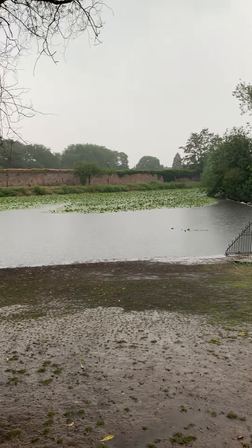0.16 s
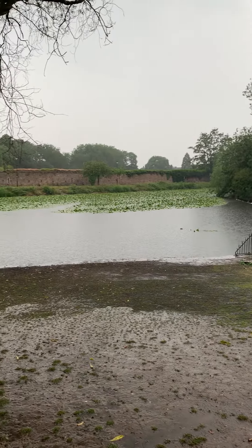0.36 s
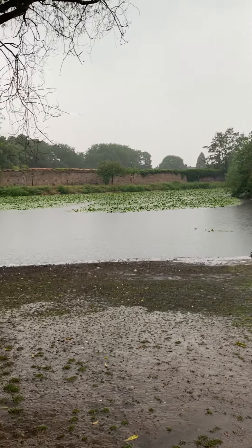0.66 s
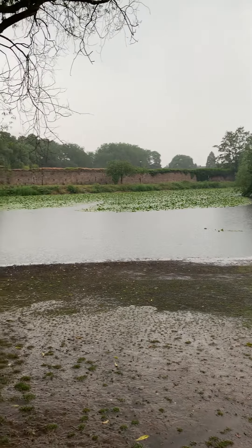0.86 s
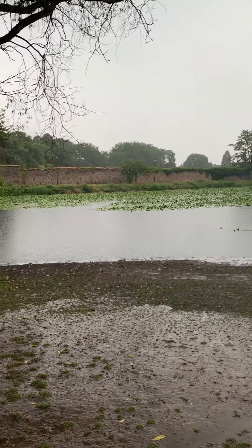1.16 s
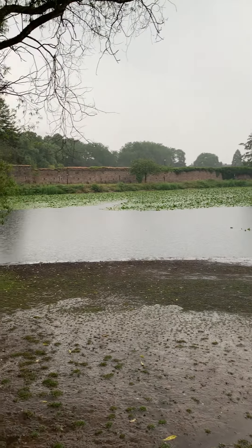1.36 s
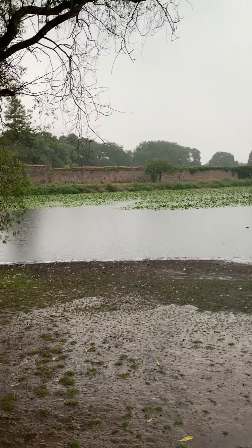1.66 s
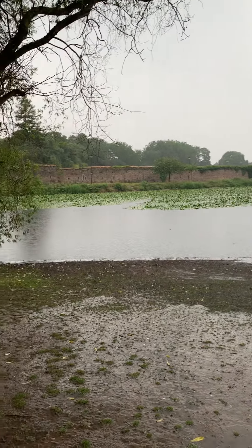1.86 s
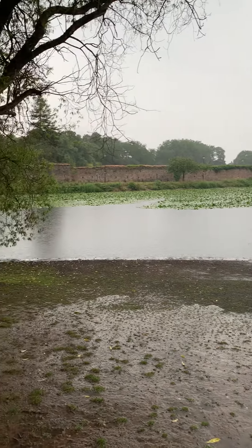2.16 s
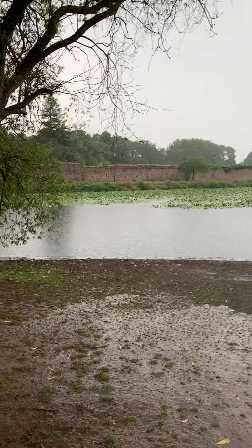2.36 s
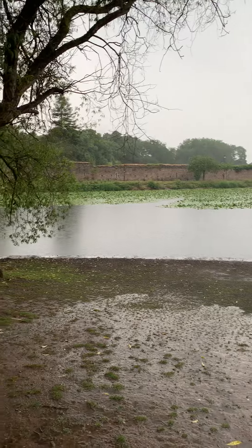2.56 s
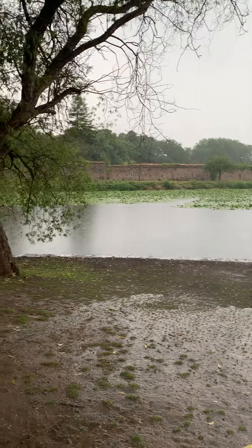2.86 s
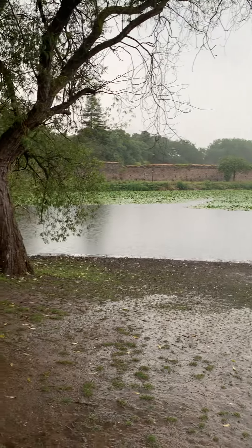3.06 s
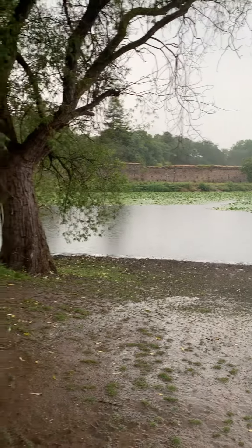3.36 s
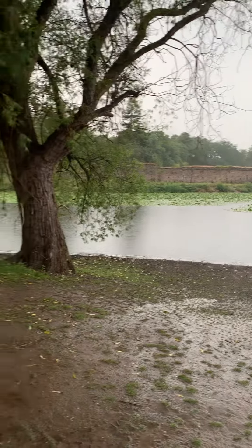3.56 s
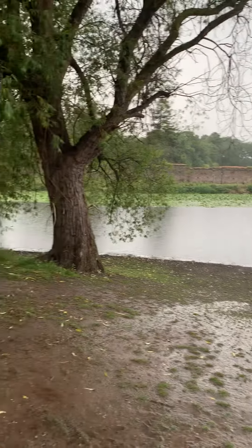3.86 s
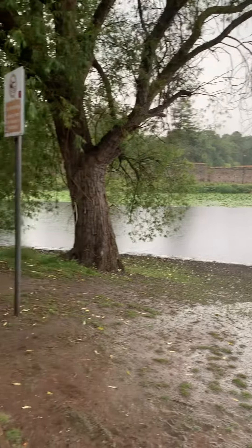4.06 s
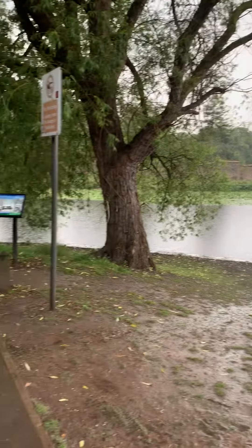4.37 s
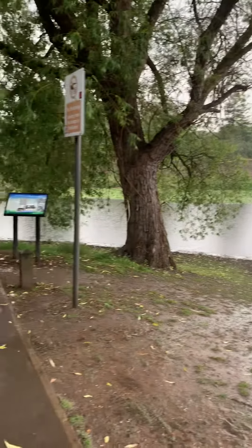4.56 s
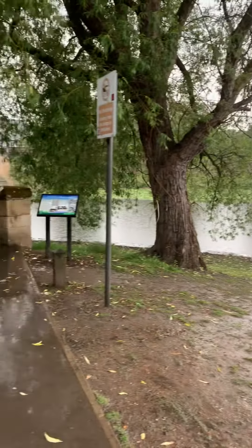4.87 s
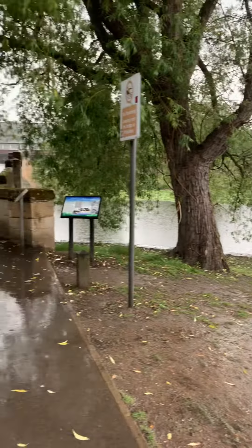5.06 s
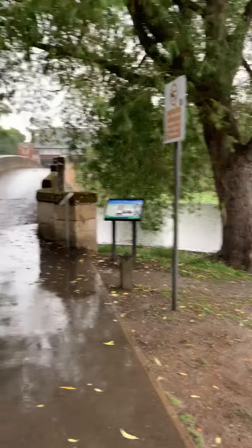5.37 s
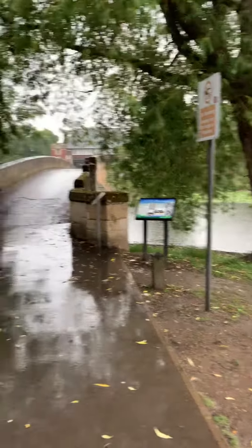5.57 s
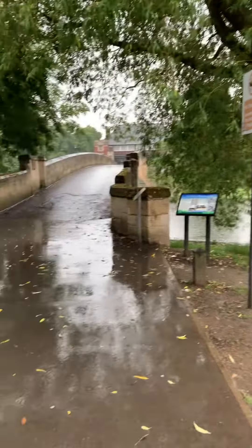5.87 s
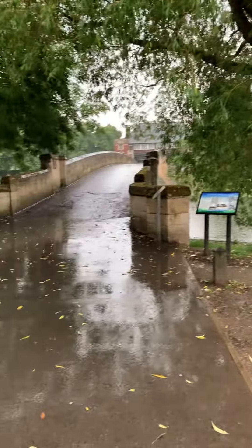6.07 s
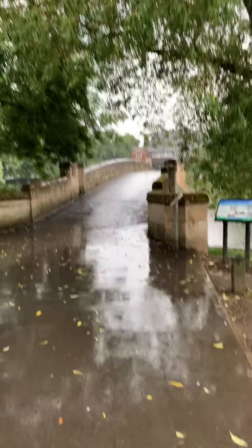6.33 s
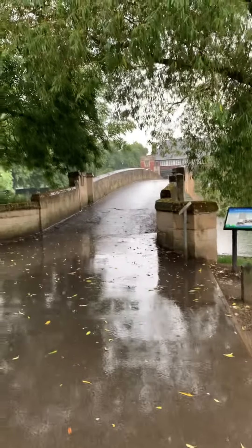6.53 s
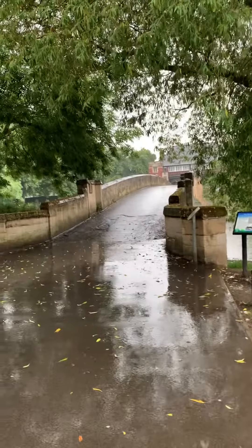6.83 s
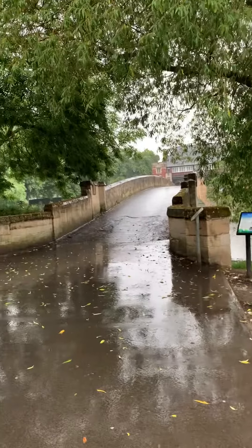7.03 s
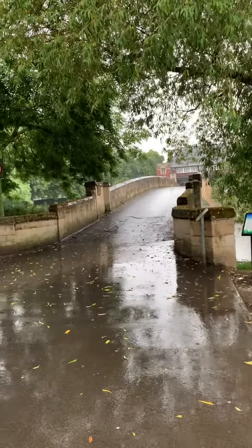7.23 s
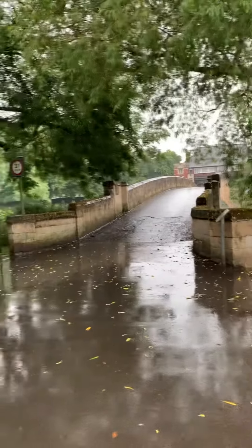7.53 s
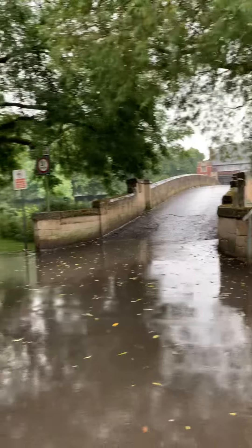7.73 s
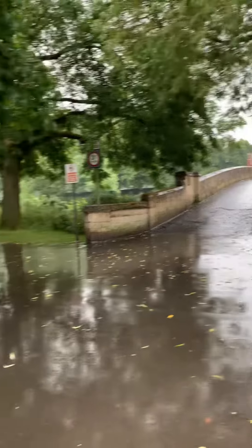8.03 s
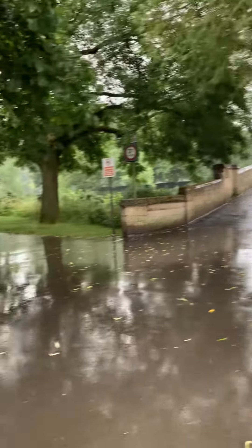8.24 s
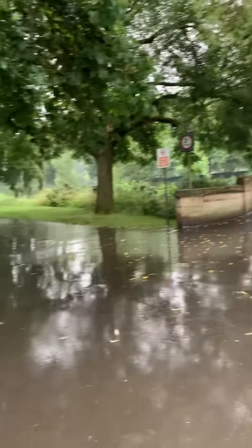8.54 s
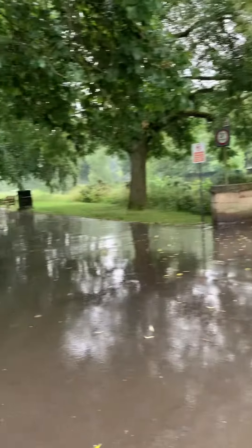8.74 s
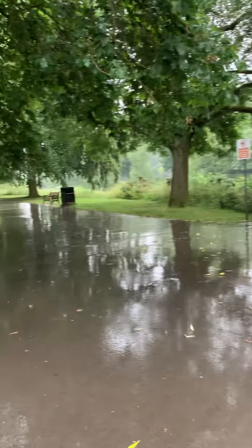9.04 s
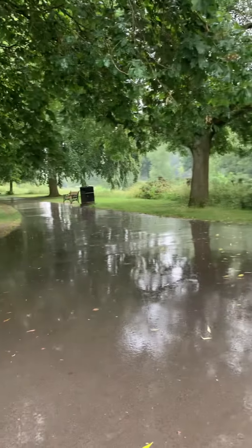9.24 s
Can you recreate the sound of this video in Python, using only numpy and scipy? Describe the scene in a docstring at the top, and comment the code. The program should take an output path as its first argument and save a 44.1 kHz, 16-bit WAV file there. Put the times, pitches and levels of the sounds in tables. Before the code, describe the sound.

Steady rain roars softly over a lake and trees, hissing on wet ground while close drops tick, plop and ring in puddles.

```python
"""Steady rain in a park

A phone under trees turns from a lake towards a puddled path. Far rain on water and foliage, shaped noise and impacts,
blends into a soft roar. Fine splashes hiss on the wet ground, single drops tick or plop close by and bubbles ring in
the puddles. Soft bumps and a rustle sound at the phone, and one short squeak is heard, over a low rumble of traffic.
Delay and phase between two close microphone ports give the rain a wide, phasey image."""
import sys
import numpy as np
from scipy import signal
from scipy.fft import rfft, irfft
from scipy.io import wavfile

SR = 44100
rng = np.random.default_rng(int(sys.argv[2]) if len(sys.argv) > 2 else 0)


def dump_mix(stems):
    """Bounce the given channels to the path in sys.argv[1] as a 16-bit WAV at rate SR."""
    frames = np.atleast_2d(stems).T  # one column per channel
    limited = np.clip(frames, -1, 1)  # hard clip at full scale
    pcm = np.round(limited * 32767).astype(np.int16)
    wavfile.write(sys.argv[1], SR, pcm)


N = 414540
TIME, FREQ = np.arange(N) / SR, np.arange(N // 2 + 1) * SR / N   # s, Hz


def from_db(db):
    """Decibels to gain."""
    return 10 ** (np.asarray(db) / 20)


def rms_one(x):
    """Scale to an rms of one."""
    return x / np.sqrt(np.mean(x ** 2) + 1e-20)


def in_time(rows):
    """Each column of a curve at every sample."""
    s, *columns = np.transpose(rows)
    return [np.interp(TIME, s, c) for c in columns]


def in_frequency(rows):
    """Each column of a spectrum at every frequency, joined on a log axis."""
    hz, *columns = np.transpose(rows)
    return [np.interp(np.log(FREQ + 1), np.log(hz), c) for c in columns]


def band(x, low_hz, high_hz, order=2):
    """Causal band-pass."""
    edges = np.clip([low_hz, high_hz], 10, .45 * SR)
    return signal.sosfilt(signal.butter(order, edges, "band", fs=SR, output="sos"), x)


def add(track, s, sound):
    """Mix a short sound into a track at time s."""
    i = int(s * SR)
    track[i:i + len(sound)] += sound[:N - i]


def drift(rate):
    """Slow chance that changes about rate times a second; spread 1."""
    slow = FREQ / (FREQ + 1) / (1 + (FREQ / rate) ** 2)
    return rms_one(irfft(rfft(rng.standard_normal(N)) * slow, N))


def shower(per_s, spread_db, largest_db):
    """Impacts at random moments, rms 1: mostly small with a few louder, or the reverse if the spread is negative."""
    size_db = np.minimum(spread_db * rng.exponential(1, N), largest_db)
    falls = rng.random(N) < per_s / SR
    return rms_one(falls * from_db(size_db) * rng.choice([-1, 1], N))


def scattered_drops(density, range_db, range_hz, count):
    """Rows (s, dB, Hz) of drops that fall by chance, more often where the density is high."""
    when, size, pitch = rng.random((count, 3)).T
    s = np.interp(when, np.cumsum(density) / np.sum(density), TIME)
    return list(zip(s, np.interp(size, [0, 1], range_db), np.interp(pitch, [0, 1], range_hz)))


def from_ground(x, turn_rad=2.25):
    """Sound from the ground reaches the right port 0.24 ms later and turned in phase."""
    spectrum = rfft(x)
    lead = 2 * np.pi * FREQ * 0.00024 + turn_rad
    return irfft(np.array([spectrum, spectrum * np.exp(-1j * lead)]), N)


# The way the phone points. Each row: time in seconds, turn in steps (0 lake, 1 tree on the bank, 2 path).
TURN = [(0, 0.02), (2.2, 0.092), (3.7, 0.78), (5.0, 1.28), (5.8, 1.7), (9.4, 2.3)]


def heading():
    """The turn of the phone at every sample, in steps from lake to path."""
    return np.clip(in_time(TURN)[0], 0, 2)


def far_patter(share, patchy_db, clump_rate):
    """Two spectra of far drops in a wash of countless smaller ones; each pitch range clumps and thins by itself."""
    washes = []
    for _ in range(2):
        drops = shower(per_s=900, spread_db=3.5, largest_db=14.5)
        washes.append(np.sqrt(share) * drops + np.sqrt(1 - share) * rng.standard_normal(N))
    spectra = rfft(washes)
    ranges = np.digitize(FREQ, np.geomspace(200, 3000, 19))
    patchy = np.zeros((2, N))
    for k in np.unique(ranges):
        patchy += irfft(spectra * (ranges == k), N) * from_db(patchy_db * drift(clump_rate))
    return rfft(rms_one(patchy))


def far_view(patter, field, low_hz, high_hz):
    """The patter as it arrives from one direction; air and leaves take the treble away."""
    level_db, likeness, lead, balance_db = in_frequency(field)
    edges = 1 / np.sqrt((1 + (low_hz / (FREQ + 1)) ** 8) * (1 + (FREQ / high_hz) ** 18))
    gain = from_db([level_db + balance_db / 2, level_db - balance_db / 2]) * edges * np.sqrt(SR / 2)
    shared, own = patter
    likeness = np.clip(likeness, 0, 1)
    right = likeness * shared * np.exp(-1j * lead) + np.sqrt(1 - likeness ** 2) * own
    return irfft(gain * np.array([shared, right]), N)


# Far rain on the lake, the bank and the trees along the path, as the two ports hear it before the edges roll off.
# Each row: frequency in Hz, level in dB per Hz, left-right likeness from 0 to 1, left lead in radians,
# left over right in dB.
LAKE = [(110, -78.5, 0.98, -0.2, 1), (194, -74, 0.95, -1.46, -0.5), (330, -76.5, 0.95, -2.5, 4),
        (520, -73, 0.07, -2, 3.5), (614, -70.5, 0.6, -2.5, 3.5), (900, -75.5, 1, -2.5, 0),
        (1150, -72.5, 0.77, -2.5, -2), (1470, -75.5, 0.3, -2, 0.5), (1620, -73, 0.8, 0.86, -2),
        (2036, -77, 0.65, -0.7, 0.5), (2390, -81.5, 0.5, 2, 0), (3600, -81, 0.45, 2.5, -2.5)]
BANK = [(110, -73, 0.75, -3, 1), (189, -74.5, 0.74, -1.5, 0), (306, -69.5, 0.77, -3, 0),
        (470, -73.5, 0.91, -2.5, 1.5), (700, -70, 0.9, -3.0, -1.5), (860, -73, 0.7, -2.5, 3),
        (1100, -75, 0.68, -2.5, -2), (1520, -74, 0.7, -2.5, -3.5), (1630, -74, 0.93, -1, -1),
        (2050, -79, 0.32, 0.5, -3.5), (2370, -80.5, 0.54, 2.5, 1.5), (3400, -85.5, 0.42, 3, -1.5)]
TREES = [(110, -78, 0.49, -3.5, 5), (190, -76.5, 0.52, -1.4, 0), (306, -72.5, 0.98, -3, 1.5),
         (465, -69, 0.88, -3.5, -0.5), (567, -70.5, 1, -4, -2), (900, -75.5, 0.97, -2.5, 1.5),
         (1300, -74, 0.79, -2.5, -2), (1520, -77, 0.38, -2, 0.5), (1720, -76.5, 0.25, 0.5, -4),
         (2070, -79.5, 0.15, 1.5, -1.5), (2440, -81.5, 0.35, 4, -1), (3530, -79.5, 0.99, 3.5, 0)]


def far_rain(turn):
    """One patter of countless drops, coloured by each direction and crossfaded as the phone turns."""
    patter = far_patter(share=0.29, patchy_db=2.13, clump_rate=11.3)
    far = np.zeros((2, N))
    for step, field in enumerate([LAKE, BANK, TREES]):
        facing = np.maximum(1 - np.abs(turn - step), 0)
        far += facing * far_view(patter, field, low_hz=104, high_hz=3150)
    return far


# Colour of the splashes on the wet ground. Each row: frequency in Hz, relative level in dB.
SPLASH_COLOUR = [(1500, -33), (2600, -9), (3400, 1), (4300, 1.3), (5500, 0.6), (7000, -1), (7600, -2),
                 (8400, -2), (9600, -4.4), (11500, -7), (13900, -8), (14600, -12), (15700, -11.5),
                 (16100, -46)]
SPLASH_DB, SPLASH_DB_PER_TURN = -47, 1.0   # facing the lake, and the rise for each step towards the path


def splashes(turn, near_db, clump_db):
    """A dense spray of tiny impacts, and sparser near ones that clump and snap in pitch ranges of their own."""
    clumps = drift(12)
    spray = shower(per_s=30000, spread_db=1.0, largest_db=16) * from_db(clump_db * clumps)
    near = np.zeros(N)
    for hz in np.geomspace(3100, 13000, 7):
        near += band(shower(per_s=70, spread_db=2.0, largest_db=7.0), hz / 1.2, hz * 1.22)
    near = rms_one(near * from_db(0.29 * clumps))
    colour_db, = in_frequency(SPLASH_COLOUR)
    hiss = rms_one(irfft(rfft(spray + from_db(near_db) * near) * from_db(colour_db), N))
    return from_ground(hiss * from_db(SPLASH_DB + SPLASH_DB_PER_TURN * turn))


# The nearest drops on hard wet ground. Each row: start in seconds, level in dB over a millisecond (before the
# common gain and left-right balance), centre in Hz.
TICKS = [(0.146, -41, 6500), (0.6877, -37, 6000), (1.1625, -48, 8000), (1.5541, -37, 10500),
         (1.916, -31.5, 14000), (1.9907, -44, 7500), (2.578, -38, 9500), (2.8787, -39, 8000),
         (3.2091, -40, 12500), (3.4856, -35, 7500), (4.461, -41, 10500), (4.659, -45, 8000),
         (4.968, -38, 9000), (5.338, -22.5, 9200), (5.3461, -27.5, 10100), (5.4352, -39, 8500),
         (5.6061, -41, 7500), (5.662, -36.5, 11300), (5.8285, -36, 9500), (6.009, -38, 6300),
         (6.0889, -39, 12000), (6.1804, -24, 9600), (6.3517, -40, 11000), (6.3844, -26, 9100),
         (6.5107, -25.5, 7960), (6.541, -31, 7800), (6.5891, -39, 11100), (6.7, -35.5, 7000),
         (6.814, -35, 8550), (6.826, -37, 8160), (6.9344, -36, 7000), (7.0423, -35, 10900),
         (7.1647, -39, 10500), (7.433, -26.8, 12000), (7.4521, -24, 6700), (7.4976, -29, 6800),
         (7.8074, -42, 8000), (7.9042, -35.5, 7700), (8.078, -36.5, 11000), (8.264, -35, 7900),
         (8.2894, -24, 5330), (8.3857, -28.5, 9100), (8.4835, -37, 7000), (8.8825, -31, 6500),
         (9.3147, -21, 5660), (9.3309, -37, 11500)]
TICK_WIDTH_SHARE, TICK_TOP_HZ = 0.65, 15100   # band width against its centre, and the upper edge
# Drops a little further off fall at random, more often towards the path: (lowest, highest).
FAINT_TICK_DB, FAINT_TICK_HZ = (-55, -41), (4500, 12000)
DRIPS_GAIN_PER_TURN = 1.6   # added to their rate for each step of the turn, in lake-side rates


def ticks(turn, gain_db, low_hz, crackle_db, crackle_s, spray_db, spray_s):
    """A close drop cracks at a pitch of its own, breaks up within a millisecond and sprays, differently at each port."""
    out, t = np.zeros((2, N)), TIME[:SR // 25]
    faint = scattered_drops(1 + DRIPS_GAIN_PER_TURN * turn, FAINT_TICK_DB, FAINT_TICK_HZ, count=60)
    crackle = from_db(crackle_db) * np.exp(-t / crackle_s)
    spray = from_db(spray_db) * np.exp(-t / spray_s)
    for s, level_db, hz in TICKS + faint:
        half_width_hz = TICK_WIDTH_SHARE * hz / 2
        burst = signal.unit_impulse(len(t)) + (crackle + spray) * rng.standard_normal((2, len(t)))
        snap = band(burst, max(hz - half_width_hz, low_hz), hz + half_width_hz, order=1)
        snap = band(snap, low_hz, TICK_TOP_HZ, order=4)
        for track, heard in zip(out, snap):
            rms_over_ms = np.sqrt(np.sum(heard ** 2) * 1000 / SR)
            add(track, s, from_db(level_db + gain_db) * heard / rms_over_ms)
    left, right = from_ground(out[0])[0], from_ground(out[1])[1]
    return np.array([left, right]) * from_db([[-.5], [.5]])


# The nearest fat drops from the branches on mud. Each row: start in seconds, peak in dB before the common gain,
# pitch at the loudest moment in Hz, swell in seconds.
PLOPS = [(0.3047, -37, 1510, 0.002), (0.5788, -27, 950, .0022), (2.4022, -30, 1390, 0.0014),
         (2.6423, -33, 1500, .0013), (2.9615, -31, 800, .0024), (3.1908, -28, 1360, 0.0018),
         (3.2905, -35, 1300, 0.0014), (3.782, -22.5, 770, 0.0019), (5.2765, -32, 1400, .0013),
         (5.3098, -23, 900, 0.0018), (5.671, -26, 380, 0.0025), (5.6949, -28, 900, .002),
         (5.9665, -31, 1400, 0.0015), (7.0700, -25, 1000, 0.0014), (7.0706, -26.5, 615, 0.00314),
         (7.5883, -27.5, 1470, 0.0017), (7.6062, -27, 1400, .0013), (8.3690, -36, 330, 0.0047),
         (8.4555, -29, 1240, 0.0017), (9.0775, -35, 1400, .0013), (9.2702, -28, 1150, 0.0016)]
PLOP_START_RATIO = 3.58   # starting pitch against the pitch at the loudest moment
# Smaller ones at random: (lowest, highest), and their swell in seconds.
FAINT_PLOP_DB, FAINT_PLOP_HZ, FAINT_PLOP_S = (-41, -38), (900, 1910), 0.00144


def plops(turn, gain_db):
    """A fat drop digs a dent that widens, so its pitch plunges in a few cycles; small ones thin out towards the path."""
    out, t = np.zeros(N), TIME[:SR // 25]
    small = scattered_drops(1 + turn.max() - turn, FAINT_PLOP_DB, FAINT_PLOP_HZ, count=60)
    faint = [(*drop, FAINT_PLOP_S) for drop in small]
    for s, peak_db, hz, swell_s in PLOPS + faint:
        age = t / swell_s
        pitch = hz * PLOP_START_RATIO / (1 + (PLOP_START_RATIO - 1) * age)
        swell = (age * np.exp(1 - age)) ** 2
        add(out, s, from_db(peak_db + gain_db) * swell * np.sin(2 * np.pi * np.cumsum(pitch) / SR))
    return from_ground(out, turn_rad=1.51)


def dipped(wash):
    """The middle of the wash dips briefly around each near fat drop."""
    nearest_s = np.min([np.abs(TIME - drop[0]) for drop in PLOPS], axis=0)
    dip = 0.4 * np.exp(-(nearest_s / 0.014) ** 2)   # depth as a share, half length in s
    return wash - dip * band(wash, 1050, 2500, order=1)


def bubbles(level_db, spread_db, cycles, rise, count):
    """Drops in puddles trap bubbles all around; each rings, 60 dB down after some cycles, and rises a little in pitch."""
    out, t = np.zeros((2, N)), TIME[:SR // 12]
    for when, size, distance, bearing in rng.random((count, 4)):
        hz = 450 * (2400 / 450) ** size
        age = t * hz / cycles
        fade = from_db(level_db - spread_db * distance - 60 * age)
        ring = fade * np.exp(2j * np.pi * hz * t * (1 + rise * age))
        add(out[0], when * N / SR, ring.imag)
        # the bearing turns the phase at the right port
        add(out[1], when * N / SR, (ring * np.exp(2j * np.pi * bearing)).imag)
    return out


# Soft bumps on the phone's case. Each row: start in seconds, peak of the swell in dB, pitch in Hz.
BUMPS = [(4.327, -40, 86), (5.274, -37.5, 110), (5.352, -42, 273), (5.425, -36, 95), (5.56, -39, 74.6),
         (5.745, -39, 64), (8.423, -41, 114), (9.276, -36.5, 115)]


def bumps(swell_s):
    """Dull knocks of a few cycles, swelling and dying."""
    out, t = np.zeros(N), TIME[:SR // 10]
    swell = t / swell_s * np.exp(1 - t / swell_s)
    for s, peak_db, hz in BUMPS:
        add(out, s, from_db(peak_db) * swell * np.sin(2 * np.pi * hz * t))
    return out


# Low rustles straight ahead. Each row: time of the peak in seconds, level at the peak in dB.
RUSTLES = [(5.385, -47.5), (5.68, -55), (8.38, -50)]
RUSTLE_SWELL_S, RUSTLE_FADE_S = 0.05, 0.049
RUSTLE_BED_DB, RUSTLE_BED_DB_PER_TURN = -65, 0.5   # the faint rustle between them


def rustle(turn, low_hz, high_hz):
    """A soft, grainy rustle of band-passed impacts that now and then swells and fades."""
    swells = np.zeros(N)
    for s, db in RUSTLES:
        away = np.maximum((s - TIME) / RUSTLE_SWELL_S, (TIME - s) / RUSTLE_FADE_S)
        swells += from_db(db) * np.exp(-away)
    level = np.maximum(swells, from_db(RUSTLE_BED_DB + RUSTLE_BED_DB_PER_TURN * turn))
    return level * rms_one(band(shower(per_s=700, spread_db=-1.0, largest_db=19), low_hz, high_hz))


# One short squeak. Each row: time in seconds, pitch in Hz, level in dB before the partials and the common gain.
SQUEAK = [(5.358, 900, -60), (5.371, 877, -33), (5.385, 842, -33), (5.394, 818, -38), (5.411, 810, -36),
          (5.425, 760, -63)]
# Its partials, with half multiples where it rasps. Each row: multiple of the pitch, relative level in dB.
SQUEAK_PARTIALS = [(0.5, -18), (1, -3), (1.5, -11), (2, -1.5), (2.5, -9)]


def squeak(gain_db, rough):
    """A rough, falling tone with a strong second partial; a fast random waver of the pitch roughens it."""
    hz, level_db = in_time(SQUEAK)
    waver = rms_one(band(rng.standard_normal(N), 30, 250))
    phase = 2 * np.pi * np.cumsum(hz * (1 + rough * waver)) / SR
    tone = sum(from_db(db) * np.sin(k * phase) for k, db in SQUEAK_PARTIALS)
    sounding = (TIME > SQUEAK[0][0]) & (TIME < SQUEAK[-1][0])
    return from_ground(tone * sounding * from_db(level_db + gain_db), turn_rad=1.4)


# Distant traffic swells and ebbs. Each row: time in seconds, level in dB before the random waver.
TRAFFIC_LEVEL = [(0, -53.5), (0.9, -50.5), (2.6, -49.5), (3.7, -52), (5.2, -49.5), (6.7, -50), (9.4, -49.5)]
# Its colour. Each row: frequency in Hz, relative level in dB.
TRAFFIC_COLOUR = [(15, -28), (30, -19), (40, -19), (48, -4.5), (55, 1), (64, -2), (75, -4), (88, -9),
                  (115, -11), (170, -20.5), (300, -65)]
TRAFFIC_WAVER_DB, TRAFFIC_WAVERS_PER_S = 0.6, 5.1


def traffic(path_share, lake_side_db, path_side_db):
    """A low rumble of coloured noise, centred across the lake and wider towards the path."""
    colour_db, = in_frequency(TRAFFIC_COLOUR)
    level_db = in_time(TRAFFIC_LEVEL)[0] + TRAFFIC_WAVER_DB * drift(TRAFFIC_WAVERS_PER_S)
    mid, side = rms_one(irfft(rfft(rng.standard_normal((2, N))) * from_db(colour_db), N))
    side = side * from_db(lake_side_db + path_share * (path_side_db - lake_side_db))
    return from_db(level_db) * np.array([mid + side, mid - side]) * from_db([[.4], [-.4]])


def scene():
    """The far rain shifts from lake to bank to path as the phone turns; the near drops fall all the while."""
    turn = heading()
    puddles = bubbles(level_db=-43.5, spread_db=12.0, cycles=94, rise=0.097, count=600)
    wash = dipped(far_rain(turn) + puddles)
    ground = splashes(turn, near_db=-11.5, clump_db=0.99)
    ground += ticks(turn, gain_db=-0.1, low_hz=3020, crackle_db=-21, crackle_s=0.00019,
                    spray_db=-37, spray_s=0.015)
    fat_drops = plops(turn, gain_db=-1.4)
    handling = bumps(swell_s=0.0045) + rustle(turn, low_hz=245, high_hz=620)
    rumble = traffic(turn / 2, lake_side_db=-35, path_side_db=-8.0)
    return wash + ground + fat_drops + handling + squeak(gain_db=-0.5, rough=0.048) + rumble


def record(dry):
    """The microphone signal is cut steeply above 16.6 kHz."""
    return signal.sosfilt(signal.ellip(10, .1, 70, 16600, fs=SR, output="sos"), dry)


dry = scene()
out = record(dry)
dump_mix(out)
```